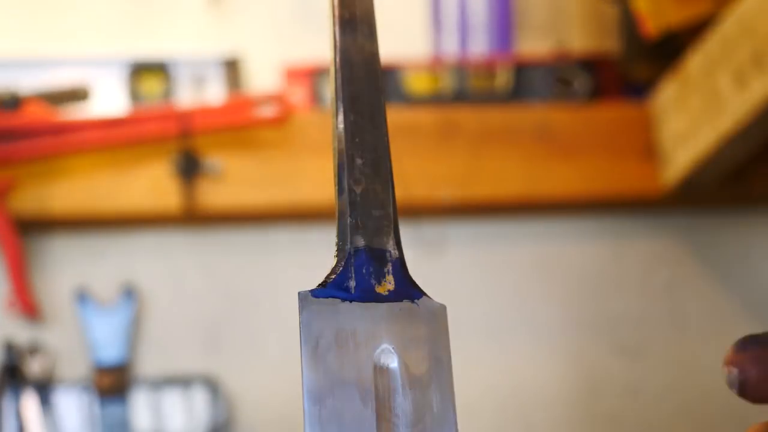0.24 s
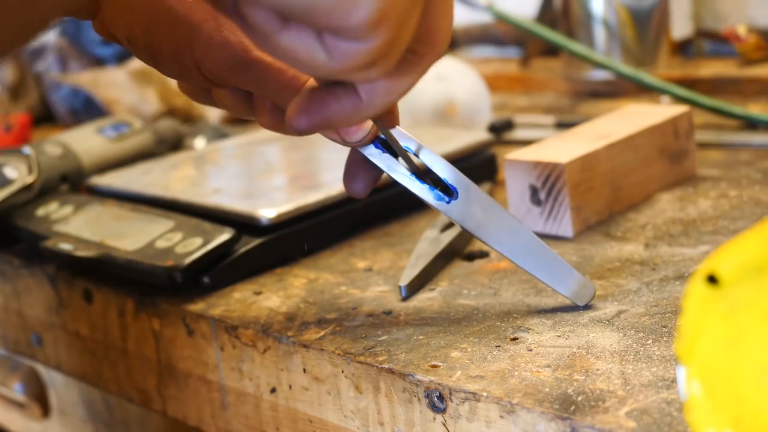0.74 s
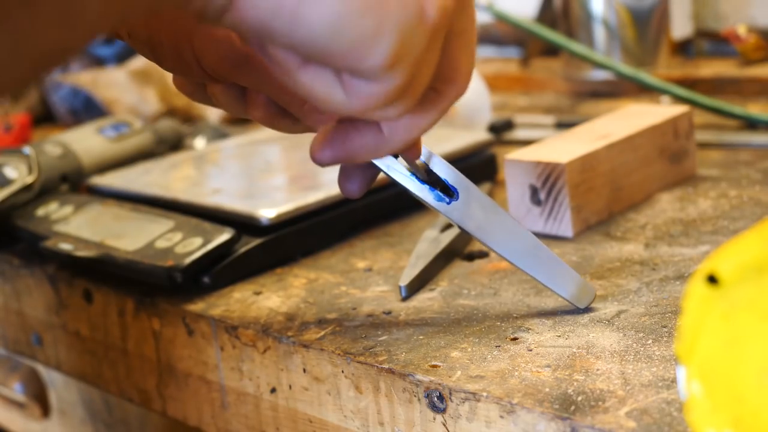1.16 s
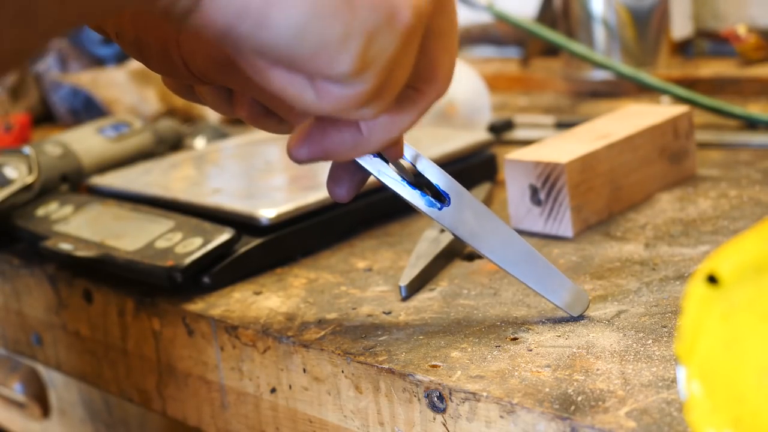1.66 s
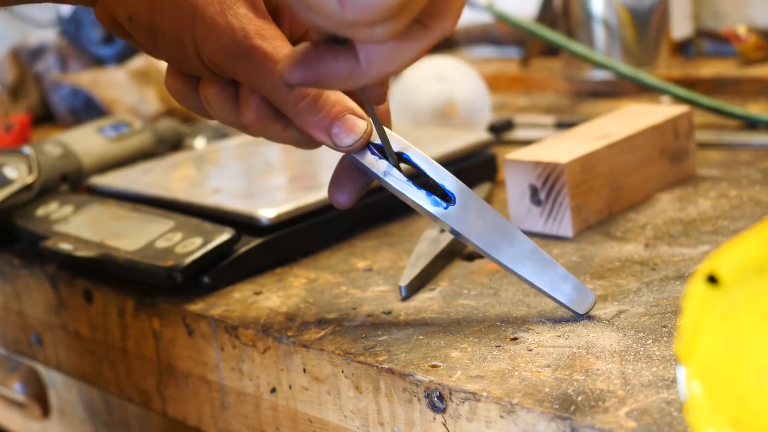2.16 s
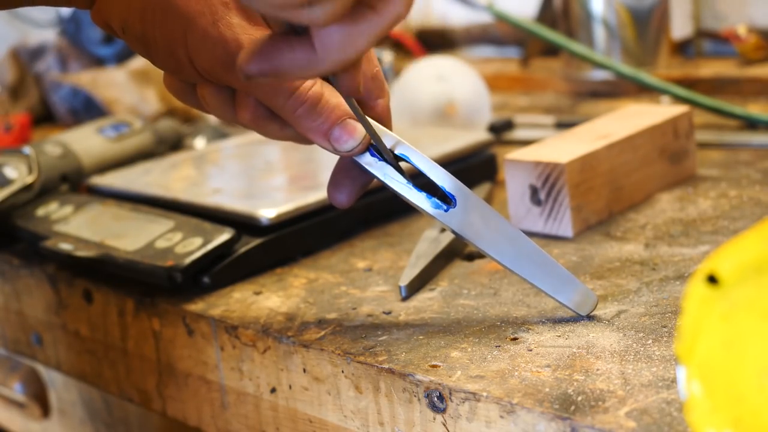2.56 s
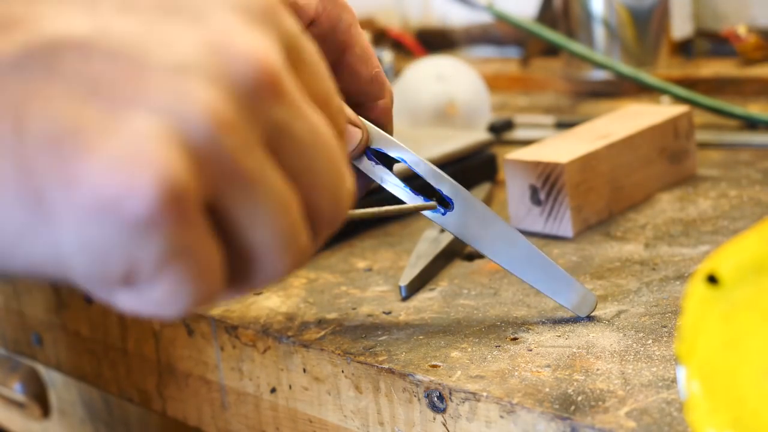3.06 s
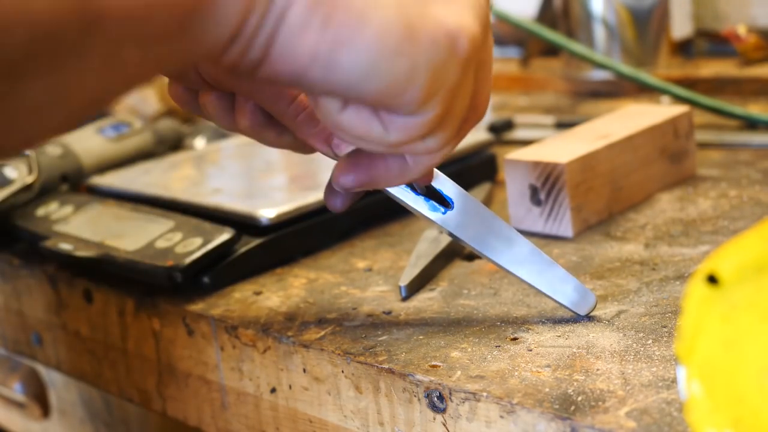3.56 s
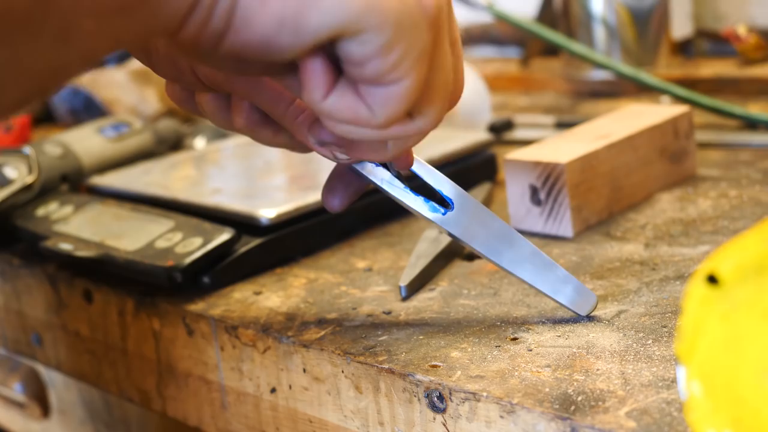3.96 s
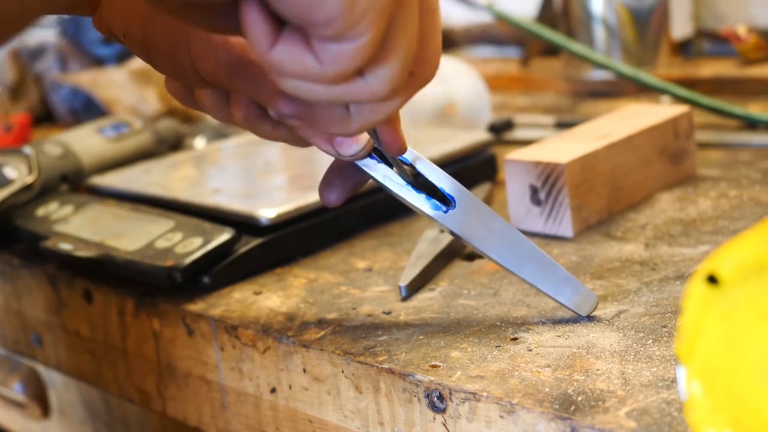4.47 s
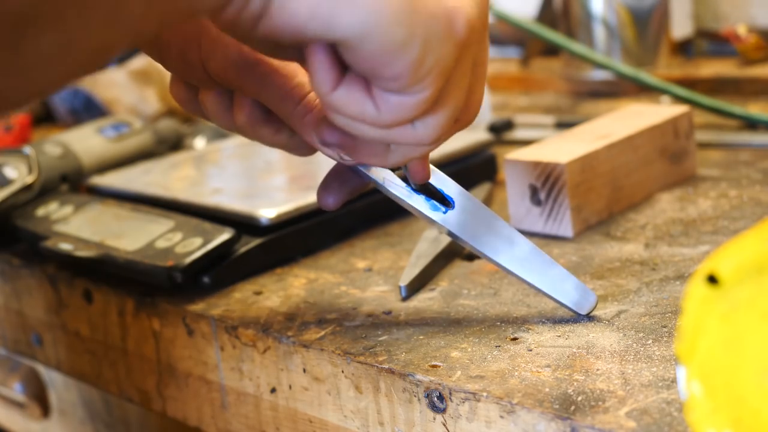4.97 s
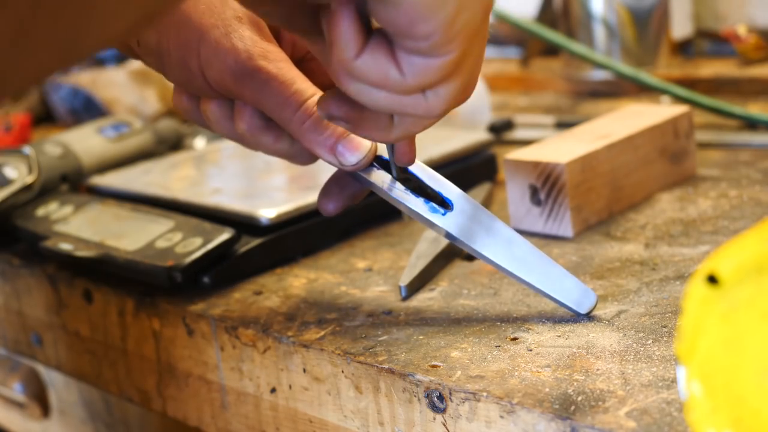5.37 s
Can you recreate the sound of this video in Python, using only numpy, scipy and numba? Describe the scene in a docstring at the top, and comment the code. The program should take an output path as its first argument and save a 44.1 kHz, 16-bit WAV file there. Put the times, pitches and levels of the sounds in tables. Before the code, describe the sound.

Close in a quiet workshop: a metal part slides home and ticks over bass rumble, then a beat of nothing. Quick to-and-fro filing on small steel follows, about twenty cuts per second, scratchy with short muted metallic ringing and high fizz. It pauses briefly, stops for about half a second, resumes louder and more unevenly, then thins out. Thin hiss and a barely audible gliding whine lie beneath.

```python
"""A rumbling workshop, where a steel part scrapes home, rings and ticks; then a beat of silence. Next a bench:
a needle file rasps to and fro in a slot of a steel bar, the strokes following close on one another. Dense
random tooth clicks, shaped into a burst per stroke, drive resonators for bar, slot walls and file shank, and
filters for dry scratch and bright spray. Below lie thin hiss, a hum and a gliding whine."""
import sys
import numpy as np
from scipy import signal
from scipy.fft import rfft, irfft, next_fast_len
from scipy.io import wavfile
from scipy.ndimage import uniform_filter1d
from numba import njit

SR = 44100
rng = np.random.default_rng(int(sys.argv[2]) if len(sys.argv) > 2 else 0)


def bounce(signal):
    """Save signal as a 16-bit WAV file at the path given by the first command-line argument."""
    frames = np.transpose(np.atleast_2d(signal))
    limited = np.clip(frames, -1, 1)
    pcm = np.round(limited * 32767).astype(np.int16)
    wavfile.write(sys.argv[1], SR, pcm)


N = 247842

# Levels in the tables are relative drives or balances; the layers add their own trims.
# cutting strokes, one list per unbroken run: t/s of the peak, level/dB, treble over level/dB
CUT_RUNS = [
    [(0.617, -40, -28)],
    [(0.681, -31.5, -14.5), (0.728, -30, -8), (0.777, -34, -1.5), (0.822, -30, -6), (0.87, -31, -9),
     (0.915, -40.5, -2.5), (0.958, -38.5, -7.5), (1.006, -33, -10), (1.054, -33.5, -12), (1.094, -32, -6),
     (1.141, -36.5, -6), (1.187, -36.5, -8), (1.236, -31, -5.5), (1.284, -34, -7), (1.326, -33, -3),
     (1.379, -31, 0.5), (1.421, -35.5, -5.5), (1.471, -33.5, -5.5), (1.513, -36, -4), (1.559, -30.5, -3),
     (1.605, -33.5, -7), (1.652, -32.5, -6), (1.697, -30.5, -8.5), (1.743, -34.5, -9), (1.785, -32, -7),
     (1.828, -36, -31)],
    [(2.028, -31, -36), (2.076, -31.5, -5.5), (2.096, -37.5, -5), (2.121, -36.5, -17), (2.169, -36.5, -14),
     (2.232, -38.5, -25), (2.255, -36.5, -7), (2.296, -41.5, -15), (2.343, -37, 2), (2.389, -40, -17),
     (2.432, -37, -10), (2.481, -36, -8), (2.526, -39.5, -5), (2.567, -33, -9), (2.613, -37.5, -2.5),
     (2.656, -36, -9), (2.702, -37, -9), (2.726, -40, -6), (2.768, -41, -10), (2.79, -40, -2),
     (2.834, -33, -4.5), (2.868, -60, 10)],
    [(3.357, -41, -31), (3.391, -29.5, -5), (3.445, -29.5, -6.5), (3.503, -28.5, -6), (3.545, -31, -37),
     (3.575, -29, -10.5), (3.625, -30.5, -10), (3.671, -30.5, -25), (3.72, -33, -9.5), (3.734, -37.5, -10),
     (3.766, -31.5, -11), (3.78, -36, -10), (3.81, -33, -13), (3.826, -31.5, -12), (3.855, -28.5, -13),
     (3.895, -33.5, -8.5), (3.944, -31.5, -11)],
    [(4.026, -33, -21), (4.04, -36, -24), (4.076, -34.5, -21), (4.098, -33, -18), (4.133, -31, -15),
     (4.17, -39, -12), (4.192, -38, -12)],
    [(4.243, -30, -10.5), (4.291, -29, -5), (4.334, -39, 3.5), (4.373, -27.5, -12)],
    [(4.455, -28, -9.5), (4.488, -37, 3), (4.507, -30, -7.5), (4.559, -31, -14), (4.607, -26, -9),
     (4.656, -34, -4), (4.679, -32.5, -11), (4.726, -29, -10.5), (4.747, -29, -7.5), (4.797, -32.5, -13),
     (4.82, -34, -15), (4.841, -29.5, -12), (4.887, -45, -11), (4.896, -32.5, -14), (4.913, -30, -15),
     (4.932, -33.5, -9), (4.978, -31.5, -5.5), (5.032, -31, -6.5), (5.088, -36.5, -12), (5.13, -38.5, -9),
     (5.153, -36, -8), (5.182, -38, 3), (5.233, -42, -23), (5.255, -43, -8), (5.287, -38, -2.5),
     (5.327, -40.5, -4.5), (5.383, -35, -7.5), (5.405, -37, -8), (5.43, -42.5, 3.5), (5.455, -36, -8),
     (5.472, -52, -3)],
    [(5.611, -39, -21)],
]
# weight on the pull back: t/s, level against the cuts beside it/dB
PULL_WEIGHT = [(.7, -11), (1.0, -9), (1.3, -5.5), (1.8, -6.5), (2.1, -22), (2.3, -6), (2.6, -9.5),
               (3.5, -15), (3.8, -9.5), (4.1, -4), (4.5, -10), (4.8, -2), (5.1, -2.5), (5.4, -9.5)]
# light rest of the file on the work, around runs and under the last strokes: t/s, level/dB
LIGHT_TOUCH = [
    [(.57, -56.5), (.66, -67)],
    [(1.97, -50), (2.02, -70)],
    [(3.3, -60), (3.37, -52)],
    [(5.2, -51), (5.4, -47), (5.5, -43), (5.62, -43.5)],
]
# how the file is held: t/s, tilt of the bar modes/(dB per octave), lift of the middle modes/dB
GRIP_CURVE = [
    [(.65, 0.5, -26), (.9, -3.5, 9), (1.4, 0, -3), (2.4, -2.5, -2), (3.2, 0.5, -9.5), (3.75, -1.5, 6.5),
     (4.1, -0.5, -0.5), (4.95, -2.5, -1.5), (5.15, 0, -9), (5.35, 8.5, -23), (5.55, -7.5, -7)],
]
# modes of the steel bar: f/Hz, level/dB
BAR_MODES = [(925, -4.5), (1300, -1), (1510, -12.5), (1700, 5), (1780, 2.5), (1900, 4.5), (2135, -9),
             (2400, 2), (2650, -5), (3020, 4), (3150, -0.5), (3330, 2), (3565, -14), (4080, 4.5),
             (4260, -5)]
# modes of the thin slot walls: f/Hz, level/dB
WALL_MODES = [(5150, 4), (5450, 1), (7520, -3), (8360, -9)]
# slot-wall ring over the stroke treble: t/s, level/dB
WALL_LEVEL = [(.7, -10), (1.5, -4.5), (2.5, -10), (3.5, -6.5), (4.1, 8.5), (4.4, 1), (5.2, -1.5),
              (5.55, -0.5)]
# modes of the file shank: f/Hz, width/Hz, level/dB
SHANK_RESONANCES = [(12450, 250, -4), (12850, 220, 0), (13300, 220, 0), (13800, 250, 1), (14250, 220, 0)]
# singing of the shank, the grip picks its mode: t/s, level/dB, favoured f/Hz
SHANK_SONG = [
    [(.59, -61.5, 13960), (1.46, -60, 13050), (1.83, -67.5, 13500)],
    [(2.03, -65, 13500), (2.4, -68, 13400), (2.89, -65, 13000)],
    [(3.37, -53, 13400), (3.5, -65, 13500), (3.72, -69, 13400), (3.82, -62, 13350), (3.95, -70, 13300)],
    [(4.24, -74, 13200), (5.62, -78, 13500)],
]
# colour of the unpitched scratch: f/Hz, level/dB
SCRATCH_COLOUR = [(300, -87), (520, -7), (780, -7.5), (950, 2), (2000, 1), (4100, 3), (6000, -42)]
# light rub before the cuts, overlapping swells: middle t/s, half length/s, f/Hz, width/Hz, level/dB
LIGHT_RUB = [(3.2, 0.095, 2140, 300, -45), (3.274, 0.082, 900, 120, -34.5), (3.33, 0.021, 4030, 250, -36.5),
             (3.332, .02, 13260, 300, -31)]
# hard tooth catches that wake one mode: t/s, f/Hz, level/dB
TOOTH_CATCHES = [(.775, 1780, -13), (1.381, 4210, -16.5), (2.834, 1760, -11), (3.624, 2450, -6),
                 (4.372, 3050, -9), (4.886, 1820, -10.5), (5.033, 1990, -12), (5.182, 4340, -12)]
# the part slides home: t/s, level/dB
SLIDE_LEVEL = [(.105, -69), (.118, -46), (.138, -40), (.16, -48), (.17, -71)]
# modes of the sliding part: f/Hz, width/Hz (35 at least when rung), level/dB
PART_MODES = [(2930, 190, -15), (4860, 150, -13), (6700, 26, -10), (9040, 100, -7.5), (11150, 410, -11),
              (12550, 99, 3.5)]
# the part's tick: t/s, level/dB
TICK_TIMES = [(0.281, -49.5)]
# glides of the faint whine: t/s, pitch f/Hz, level/dB
WHINE_GLIDES = [
    [(3.42, 168, -70), (3.6, 189, -66), (3.97, 170, -64)],
    [(4.85, 212, -62), (5.0, 228, -60), (5.09, 237, -59), (5.17, 221, -57), (5.27, 204, -64)],
]
# audible whine harmonics: multiple of the pitch, level/dB
WHINE_HARMONICS = [(3, -5), (4, 0), (5, -4), (6, -4)]
# steady hum at the bench: f/Hz, rms level/dB
HUM_TONES = [(381, -83.5)]
# colour of the bench hiss: f/Hz, level per Hz/dB
HISS_COLOUR = [(150, -31.5), (300, -20), (600, -5.5), (900, -3), (1450, -7.5), (2170, -8), (11900, -11.5),
               (16000, -10.5)]
# colour of the shop rumble: f/Hz, level per Hz/dB
RUMBLE_COLOUR = [(15, -3.5), (60, -2.5), (130, -11), (540, -29), (750, -40), (1500, -42.5), (4000, -48.5),
                 (16000, -55.5)]
# stereo side against mid: f/Hz, level/dB
SIDE_COLOUR = [(150, -48), (400, -18), (700, -26), (1300, -30), (2400, -25), (4400, -13), (8000, -8),
               (15000, -8)]
# stereo balance, left minus right: f/Hz, level/dB
PAN_COLOUR = [(2800, 0), (4200, -3), (9000, -3), (13000, 1.5)]

SHOP_END_S, BENCH_START_S = .332, 0.386
TOP_HZ = 15770
HISS_DB, RUMBLE_DB = -57, -45  # rms
# the pull sits at a share of the gap between two cuts; shorter gaps have none
PULL_AT, PULL_ROOM_S = .53, .034
PULL_SCATTER_DB, PULL_TREBLE_DB, PULL_TREBLE_SCATTER_DB = 1.8, -15, 4
# a stroke swells and dies fast; the drag around it starts just before and trails off
BITE_RISE_S, BITE_FALL_S, DRAG_RISE_S, DRAG_FALL_S = 0.0049, 0.0058, 0.016, 0.038
SNAG_DB, SNAG_PER_S = 1, 160
BAR_DRAG_DB, BAR_LEAD_S = -11.5, .0025
BAR_PATCHY_DB, WALL_PATCHY_DB, SPRAY_SCATTER_DB = 2.5, 4, 2.6
MIDDLE_OCTAVES, MIDDLE_WIDTH_OCTAVES = .7, .3  # octaves over 1800 Hz
WAVER_DB, WAVER_PER_S = 2.5, 90  # each mode's level wavers at random, far slower than the tooth clicks
WANDER_SHARE, WANDER_PER_S = 0.014, 60  # modes shift as contact and fingers move
STEEL_WIDTH_HZ, STEEL_WIDTH_SHARE = 25, .02  # damping by the fingers grows with pitch


def filing():
    """Each stroke shakes bar, slot walls and shank; a lighter drag bridges the turns."""
    s, peak_db, treble_db = strokes()
    grit = teeth(4500, scatter_db=2.8)
    touch = uniform_filter1d(gain_curve(*LIGHT_TOUCH), SR // 80)
    snag = undb(SNAG_DB * flicker(SNAG_PER_S))  # the drag slips and catches

    def push(db, patchy_db, drag_db, lead_s=0):
        """Hand force: a sharp bite per stroke over a slower, snagging drag."""
        gains = undb(db + patchy_db * rng.standard_normal(len(s)))
        bite = bursts(s - lead_s, gains, BITE_RISE_S, BITE_FALL_S)
        drag = bursts(s, gains, DRAG_RISE_S, DRAG_FALL_S)
        return bite + undb(drag_db) * snag * drag

    bright_db = peak_db + treble_db
    layers = (bar(grit, push, peak_db, touch) + scratch(grit, push, peak_db, touch)
              + slot_walls(grit, push, bright_db, touch) + spray(push, bright_db, touch)
              + shank(grit, push) + light_rub(grit) + tooth_catches(grit))
    # the filing carries little bass: its low end is weakened below 700 Hz
    return colour(layers, [(100, -16.0), (700, -4.0)])


def bar(grit, push, peak_db, touch):
    """Tooth clicks ring the finger-damped bar; the grip tilts and lifts its modes."""
    tilt_db, lift_db = track(GRIP_CURVE, col=1), track(GRIP_CURVE, col=2)

    def on_bar(hz):
        octaves = np.log2(hz / 1800)
        middle = np.exp(-((octaves - MIDDLE_OCTAVES) / MIDDLE_WIDTH_OCTAVES) ** 2)
        grip_db = tilt_db * octaves + lift_db * middle
        # where the teeth bite decides which modes speak: a fresh draw per mode and stroke
        force = push(peak_db, BAR_PATCHY_DB, BAR_DRAG_DB, lead_s=BAR_LEAD_S)
        return grit * (force + touch) * undb(grip_db)

    return undb(8.0) * held(BAR_MODES, on_bar)


def scratch(grit, push, peak_db, touch):
    """Unpitched rasp: the tooth clicks follow the force and pass one fixed filter."""
    force = push(peak_db, patchy_db=0.16, drag_db=-7.5) + undb(6.5) * touch
    return undb(-4.5) * colour(grit * force, SCRATCH_COLOUR)


def slot_walls(grit, push, bright_db, touch):
    """The thin slot walls ring high, driven by the treble of each stroke."""
    wall_grit = grit * gain_curve(WALL_LEVEL, hold=True)

    def on_wall(hz):
        return wall_grit * (push(bright_db, WALL_PATCHY_DB, drag_db=-11.5) + touch)

    return undb(7.0) * held(WALL_MODES, on_wall)


def spray(push, bright_db, touch):
    """Bright fizz: a denser stream of clicks follows the stroke treble through a high band."""
    force = push(bright_db, patchy_db=0.24, drag_db=-15.5) + touch
    clicks = teeth(12000, scatter_db=SPRAY_SCATTER_DB)
    return colour(clicks * force, [(4000, -16.5), (6000, 0.0), (9000, -2.0), (10000, -14.0), (13500, -8)])


def shank(grit, push):
    """The file shank sings with the strokes; modes near the favoured pitch take most of the force."""
    sing = grit * gain_curve(*SHANK_SONG)
    favoured_hz = track(SHANK_SONG, col=2)

    def on_shank(hz):
        force = push(0, patchy_db=4, drag_db=-24) + .04
        return sing * force * np.exp(-((hz - favoured_hz) / 600) ** 2)

    return undb(28.0) * body(SHANK_RESONANCES, on_shank)


def light_rub(grit):
    """Light rub before the cuts: overlapping swells of clicks, each through its own resonance."""
    return sum(ring(grit * undb(db) * swell(mid, half, half), hz, width)
               for mid, half, hz, width, db in LIGHT_RUB)


def tooth_catches(grit):
    """A tooth catches hard: a brief swell of clicks lifts one mode above the rest."""
    return sum(ring(grit * undb(db) * swell(at, 0.0038, 0.009), hz, 127) for at, hz, db in TOOTH_CATCHES)


def strokes():
    """Times, levels and treble of all cuts, and of a lighter, duller pull back in each roomy gap."""
    runs = [np.reshape(run, (-1, 3)) for run in CUT_RUNS]
    before = np.vstack([run[:-1] for run in runs])
    after = np.vstack([run[1:] for run in runs])
    gap = after[:, 0] - before[:, 0]
    chance = rng.standard_normal((len(before), 2))
    s = before[:, 0] + PULL_AT * gap
    weight_db = np.interp(s, *np.transpose(PULL_WEIGHT))
    db = (before[:, 1] + after[:, 1]) / 2 + weight_db + PULL_SCATTER_DB * chance[:, 0]
    treble_db = PULL_TREBLE_DB + PULL_TREBLE_SCATTER_DB * chance[:, 1]
    pulls = np.transpose([s, db, treble_db])
    return np.vstack([*runs, pulls[gap > PULL_ROOM_S]]).T


def part_slide():
    """A steel part scrapes into place: scattered clicks ring its modes over a coloured scrape."""
    force = teeth(4000, scatter_db=3) * gain_curve(SLIDE_LEVEL)
    ringing = undb(12.0) * body(PART_MODES, lambda hz: force)
    scrape = colour(force, [(1000, -15.0), (2000, -1.5), (3600, 6.0), (5200, -20.0),
                            (6600, 8), (8200, -17), (12000, -3.0)])
    return ringing + undb(-4.0) * scrape


def part_tick():
    """The part ticks once: a short burst of uneven clicks, strongest near 1900 Hz."""
    s, db = np.transpose(TICK_TIMES)
    knock = teeth(2740, scatter_db=5.5) * bursts(s, undb(db), 0.0088, 0.01)
    return colour(knock, [(1100, -8), (1900, 12.5), (4500, 0.0), (8000, -9.5)])


def whine():
    """A faint whine glides past twice: a few harmonics of one wavering pitch."""
    waver_hz = uniform_filter1d(rng.standard_normal(N), SR // 50) * 80
    pitch_hz = uniform_filter1d(track(WHINE_GLIDES, col=1), SR // 25) + waver_hz
    turn = 2 * np.pi * np.cumsum(pitch_hz) / SR
    fade = uniform_filter1d(gain_curve(*WHINE_GLIDES, col=2), SR // 20)
    return np.sqrt(2) * fade * sum(undb(db) * np.sin(k * turn) for k, db in WHINE_HARMONICS)


def hum():
    """A faint steady sine tone from a random phase."""
    t = np.arange(N) / SR
    return sum(np.sqrt(2) * undb(db) * np.sin(2 * np.pi * (hz * t + rng.random())) for hz, db in HUM_TONES)


def hiss():
    """Thin room hiss: coloured steady noise."""
    return undb(HISS_DB) * unit(colour(rng.standard_normal(N), HISS_COLOUR))


def shop_rumble():
    """Low room rumble: steady noise weighted to the bass."""
    return undb(RUMBLE_DB) * unit(colour(rng.standard_normal(N), RUMBLE_COLOUR))


def teeth(per_s, scatter_db):
    """Tiny clicks of either sign at random moments with long-tailed sizes; rms 1."""
    hit, size, sign = rng.random((3, N))
    heights = undb(-scatter_db * np.log(size + 0.0034))
    return unit((hit < per_s / SR) * heights * np.sign(sign - .5))


def bursts(times, gains, rise_s, fall_s):
    """Envelope with a bell-shaped swell peaking at each time."""
    env = np.zeros(N)
    env[np.minimum((times * SR).astype(int), N - 1)] = gains
    reach = int(2 * max(rise_s, fall_s) * SR)
    t = np.arange(-reach, reach + 1) / SR
    bell = np.exp(-(t / np.where(t < 0, rise_s, fall_s)) ** 2)
    return signal.oaconvolve(env, bell, mode="same")


def swell(at, rise_s, fall_s):
    """One bell-shaped swell peaking at the given second."""
    t = np.arange(N) / SR - at
    return np.exp(-np.minimum((t / np.where(t < 0, rise_s, fall_s)) ** 2, 50))


def ring(x, hz, width_hz):
    """One damped mode, gain 1 at its centre; at least 35 Hz wide, so every ring stays short."""
    return signal.lfilter(*signal.iirpeak(hz, hz / max(width_hz, 35), fs=SR), x)


def body(modes, drive):
    """Sum of fixed modes in alternating polarity; drive(hz) is the force that reaches each."""
    return sum((-1) ** k * undb(db) * ring(drive(hz), hz, width) for k, (hz, width, db) in enumerate(modes))


def held(modes, drive):
    """Modes of a hand-held part: each is damped by the fingers, wavers in level and wanders in pitch."""
    total = np.zeros(N)
    for k, (hz, db) in enumerate(modes):
        force = drive(hz) * undb(WAVER_DB * flicker(WAVER_PER_S))
        centre_hz = hz * (1 + WANDER_SHARE * flicker(WANDER_PER_S))
        width_hz = STEEL_WIDTH_HZ + STEEL_WIDTH_SHARE * hz
        total += (-1) ** k * undb(db) * sweep(force, centre_hz, width_hz)
    return total


@njit
def sweep(x, hz, width):
    """State-variable band-pass whose centre moves; gain 1 at the centre."""
    y, b, l = np.empty(len(x)), 0., 0.  # b, l: band and low states
    for i in range(len(x)):
        g, k = np.tan(np.pi * hz[i] / SR), width / hz[i]
        v = (b + g * (x[i] - l)) / (1 + g * (g + k))
        b, l, y[i] = 2 * v - b, l + 2 * g * v, k * v
    return y


def flicker(rate):
    """Random levels held 1 / rate s and slewed; spread near 1."""
    k = int(SR / rate)
    steps = np.repeat(rng.standard_normal(N // k + 1), k)
    return 1.2 * uniform_filter1d(steps, k)[:N]


def track(tables, col):
    """A column of several (t/s, ..) tables as one curve in time."""
    rows = np.vstack(tables)
    return np.interp(np.arange(N) / SR, rows[:, 0], rows[:, col])


def gain_curve(*tables, col=1, hold=False):
    """Summed gain in time from tables with t/s first; silent outside each unless held."""
    t = np.arange(N) / SR
    outside_db = None if hold else -200
    return sum(undb(np.interp(t, [r[0] for r in rows], [r[col] for r in rows], outside_db, outside_db))
               for rows in tables)


def colour(x, points):
    """Filter by (f/Hz, level/dB) points joined on a log-frequency axis."""
    hz, db = np.transpose(points)
    size = next_fast_len(N)
    axis = np.log(np.maximum(np.fft.rfftfreq(size, 1 / SR), 1))
    return irfft(rfft(x, size) * undb(np.interp(axis, np.log(hz), db)), size)[:N]


def undb(db):
    """dB to gain."""
    return 10 ** (np.asarray(db) / 20)


def unit(x):
    """Scale to rms 1."""
    return x / np.sqrt(np.mean(x ** 2))


def scene():
    """Shop, silence, bench; reflections off bench and walls set left and right apart."""
    t = np.arange(N) / SR
    in_shop, at_bench = t < SHOP_END_S, t >= BENCH_START_S
    shop = part_slide() + part_tick() + shop_rumble()
    bench = filing() + whine() + hum() + hiss()
    mid = shop * in_shop + bench * at_bench
    lag = np.arange(SR // 5) / SR
    echoes = rng.standard_normal(len(lag)) * np.exp(-lag / .03)
    side = colour(signal.oaconvolve(mid, echoes / np.linalg.norm(echoes))[:N], SIDE_COLOUR)
    left = colour(mid, [(hz, db / 2) for hz, db in PAN_COLOUR]) + side
    right = colour(mid, [(hz, -db / 2) for hz, db in PAN_COLOUR]) - side
    return np.array([left, right]) * (in_shop | at_bench)  # no echo spills into the silence


def record(dry):
    """A steep low-pass closes the top."""
    return signal.sosfilt(signal.ellip(12, .2, 70, TOP_HZ, fs=SR, output="sos"), dry)


dry = scene()
out = record(dry)
bounce(out)
```